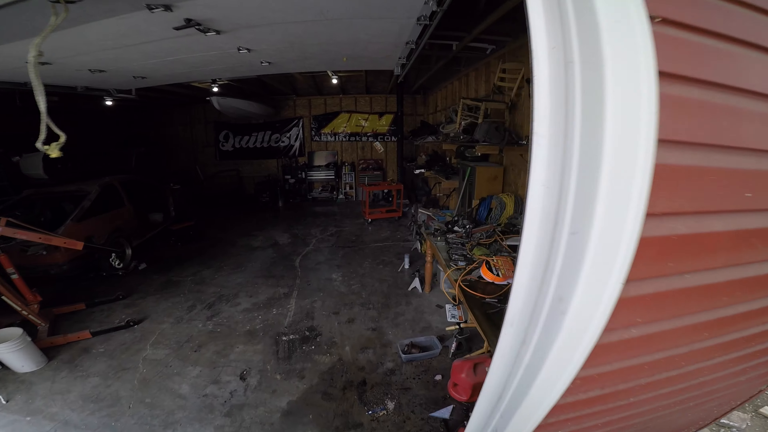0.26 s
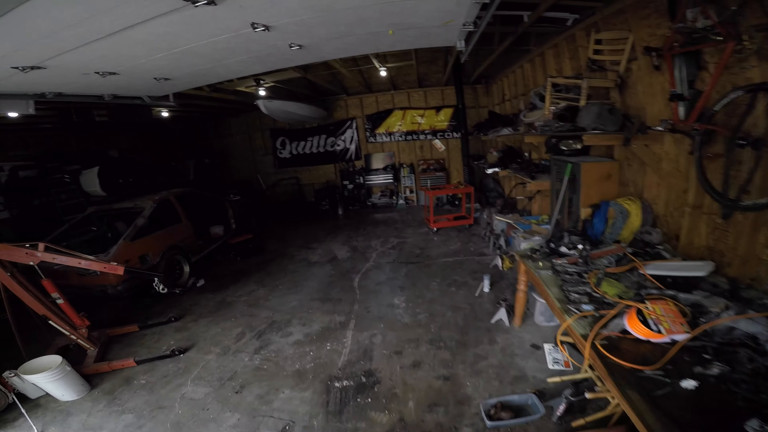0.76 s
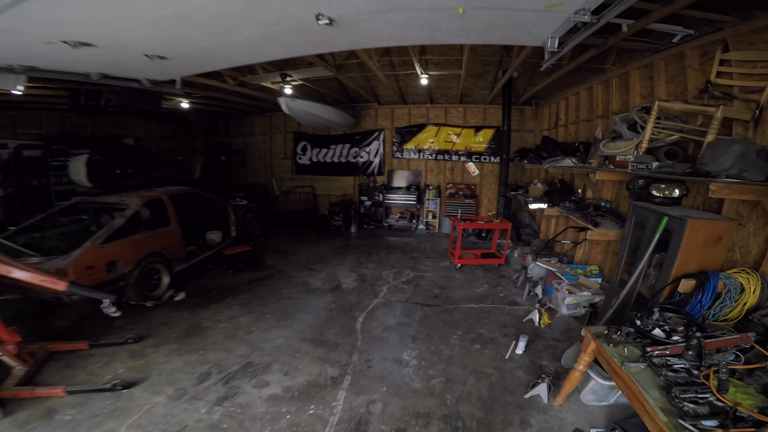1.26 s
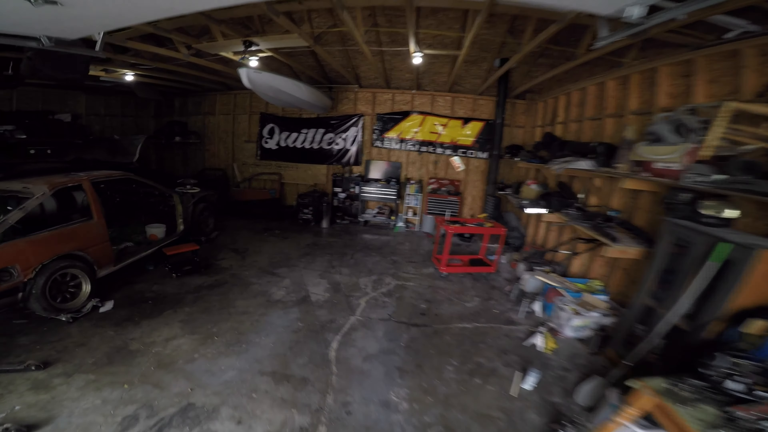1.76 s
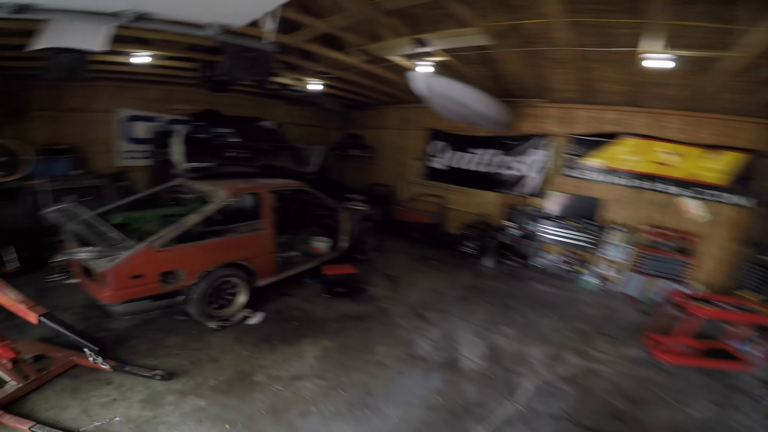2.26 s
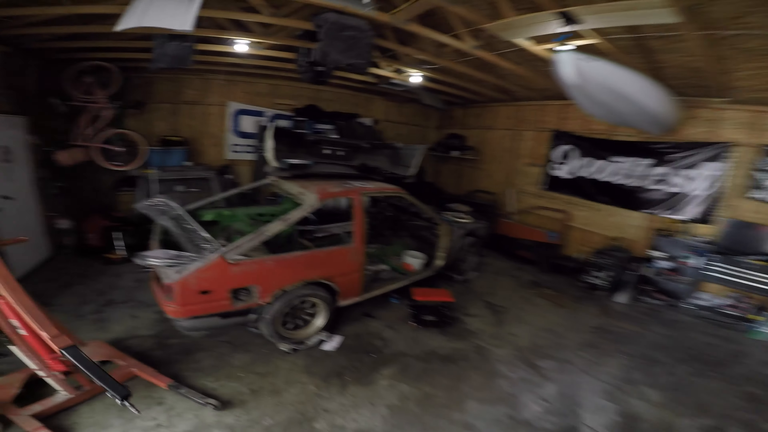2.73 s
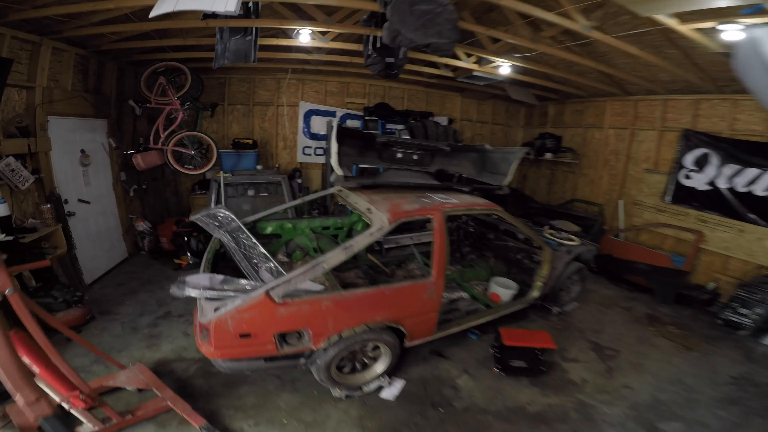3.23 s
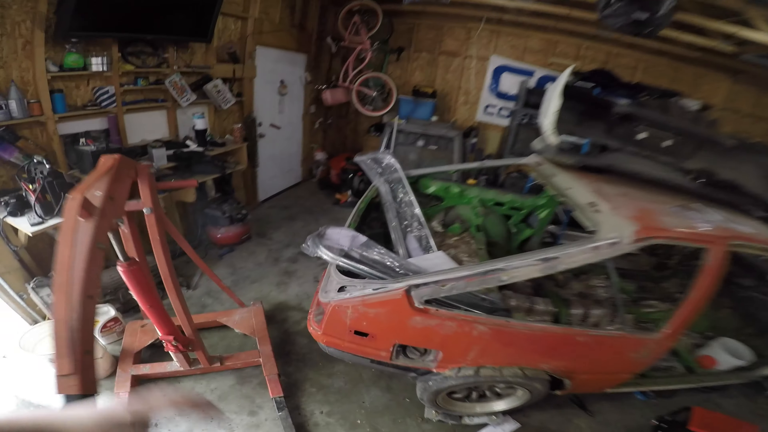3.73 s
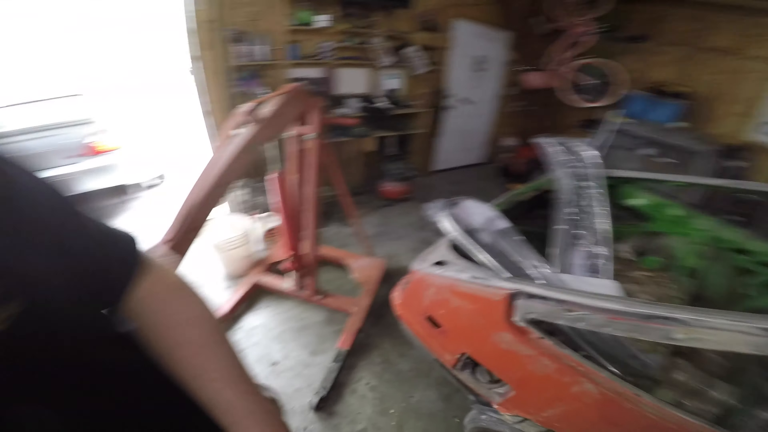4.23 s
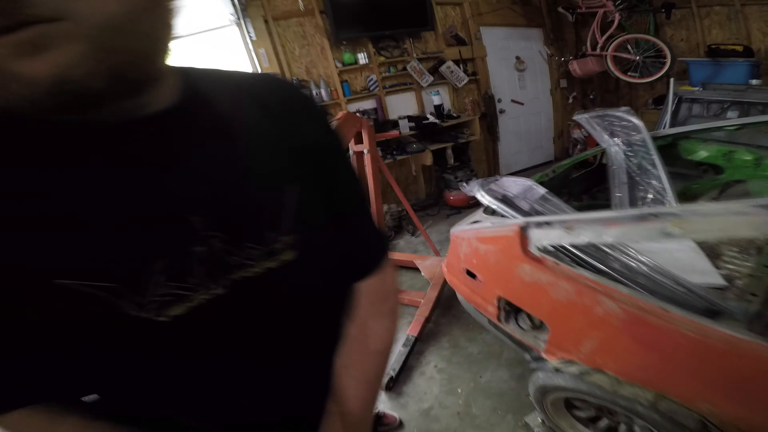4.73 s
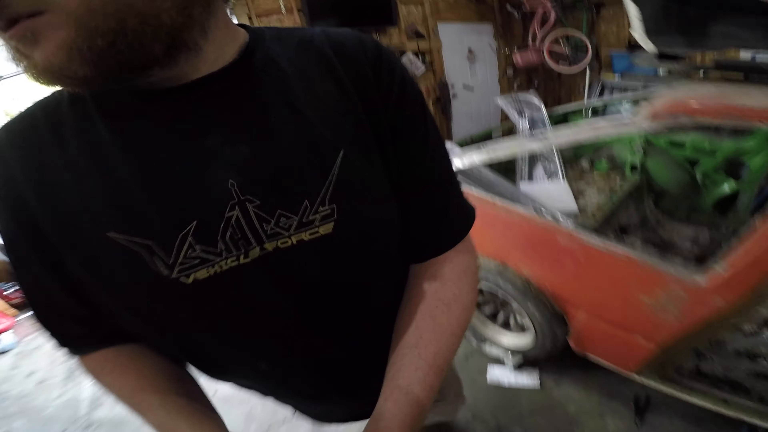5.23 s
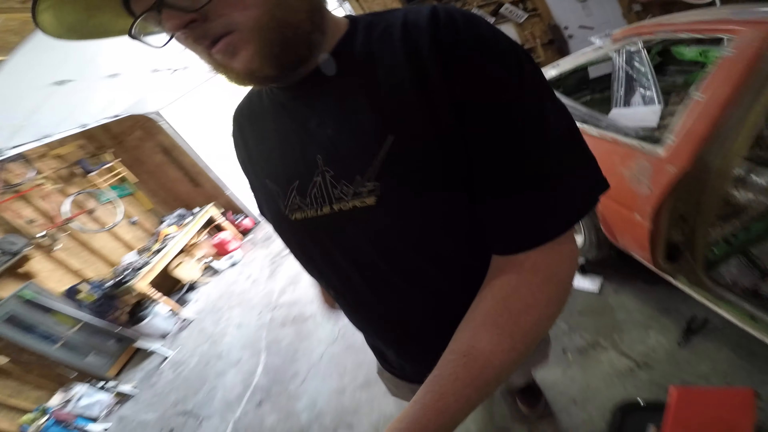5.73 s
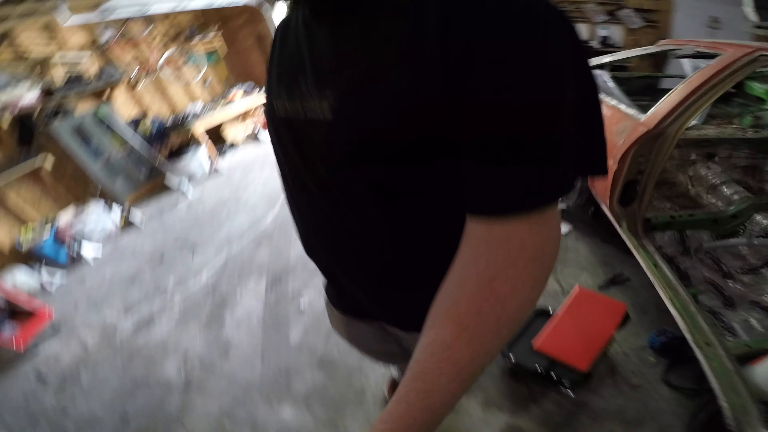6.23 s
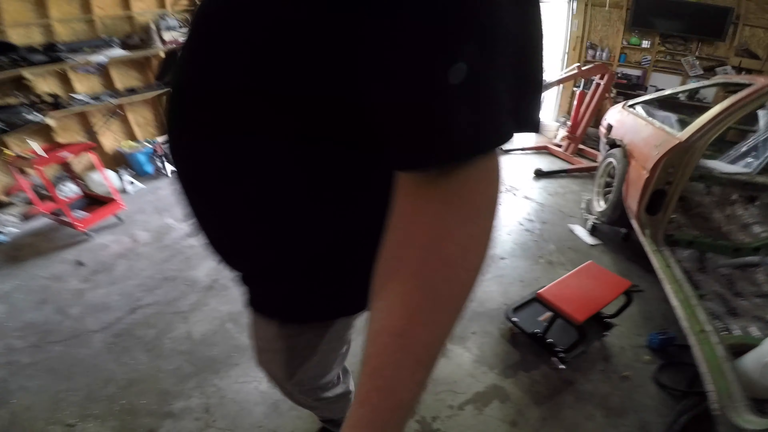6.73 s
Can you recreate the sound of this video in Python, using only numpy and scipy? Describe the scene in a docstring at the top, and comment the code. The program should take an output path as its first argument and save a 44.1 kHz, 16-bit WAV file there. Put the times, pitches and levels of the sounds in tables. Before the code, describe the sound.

Low, uneven idle of a four-cylinder engine booms in a workshop, stumbling about twice a second, while handling bumps, ticks and scuffs interrupt up close.

```python
"""Flat-four idling in a garage

A turbocharged flat-four idles with a lumpy beat; misfires upset the exhaust about twice a second.
Exhaust: harmonics of the cycle rate, shaped by the standing waves a hand-held camera is carried through.
Above it: bark from scattered firing pulses, filtered-noise rumble and hiss, and faint gliding tones.
Shoes scuff (noise swells); fingers and steps knock, nails tick and the mount creaks (clicks, ringing modes)."""
import sys
import numpy as np
from scipy import signal
from scipy.fft import rfft, irfft, next_fast_len
from scipy.io import wavfile
from scipy.ndimage import uniform_filter1d, minimum_filter1d

SR = 44100
rng = np.random.default_rng(int(sys.argv[2]) if len(sys.argv) > 2 else 0)


def generate_wav(sig):
    """Save sig (samples, or channels by samples) to the path in sys.argv[1] as 16-bit PCM at SR."""
    pcm = np.round(np.clip(np.atleast_2d(sig).T, -1, 1) * 32767).astype(np.int16)
    wavfile.write(sys.argv[1], SR, pcm)


N = 307805
T = np.arange(N) / SR   # time, s

# All table levels are relative; later gains set the final mix.

# Four-stroke cycle rate: t/s, f/Hz
CYCLE_RATE = [(0, 12.03), (1.0, 12.0), (1.351, 11.94), (2.0, 11.96), (2.8, 12.0), (3.7, 11.9), (4.0, 11.96),
              (4.45, 11.91), (5.0, 11.98), (5.65, 11.89), (6.15, 11.96), (6.98, 11.89)]
# Exhaust harmonics: multiple of cycle rate, mean level/dB
EXHAUST_ORDERS = [(3, -36), (4, -22), (5, -33.5), (6, -26), (7, -23), (8, -20), (9, -16.5), (10, -21),
                  (11, -22.5), (12, -20), (13, -28.5), (14, -31.5), (15, -23.5), (16, -41.5), (17, -29.5),
                  (18, -40), (19, -29), (20, -21), (21, -31), (22, -42), (23, -33.5), (24, -33.5),
                  (25, -43.5), (26, -43.5), (28, -39), (30, -48), (31, -46.5), (32, -50), (33, -45.5),
                  (34, -47.5), (36, -47.5), (41, -43), (46, -60), (50, -51), (54, -53.5), (61, -58)]
# Orders of four strong harmonics
STRONG_ORDERS = (8, 9, 15, 20)
# Their levels about the mean along the walk: t/s, then one level/dB per strong order
STRONG_LEVELS = [(0.15, -1.5, 0.5, -3, -2.5), (0.55, -5, 2.5, 0.5, 1), (0.9, -11.5, 5.5, -12, 4),
                 (1.2, -5.5, 5.5, -0.5, 1.5), (1.55, 1, 0, -2.5, 9), (1.92, 7, 3.5, -5.5, -2.5),
                 (2.25, 5, 3, -2.5, -1.5), (2.65, 7, 4, 1, -1), (3.0, 4.5, 0.5, -0.5, 3),
                 (3.35, 7, -3, 1, 7), (3.7, 0, -8, 5.5, 3), (4.2, 0.5, -5.5, 2, 0), (4.7, -1.5, -2, 3, -6),
                 (5.05, -1, 1, 5, -1), (5.4, -5.5, 2, -3.5, -9), (5.75, 5, 0.5, 3.5, -0.5),
                 (6.1, -3, -6.5, 5.5, -1.5), (6.45, 2, 1, -4, -4), (6.85, 3, 3, 4, -4.5)]
# A high harmonic that hums alone above its neighbours, about its mean: t/s, level/dB
HUM_LEVEL = [(0, -2.5), (.7, 5.5), (1.1, -6), (1.75, 3.5), (2.3, -9), (2.95, 4), (3.65, 4.5), (4.5, -3.5),
             (5.85, -5.5), (6.38, 6.5), (6.9, -4.5)]
HUM_ORDER = 41
# Garage standing waves, nodes crossed at even intervals; two at one pitch lie across each other:
# f/Hz, time of one node/s, node spacing/s, node depth/dB (sign ignored)
STANDING_WAVES = [(36, 3.5, 13, 16.5), (48, 3, 4.1, 3.5), (60, 2.5, 1.6, 6), (72, 4.5, 9.9, 11),
                  (84, 1, 4.61, 9), (120, 5.5, 5.66, 6.5), (120, -1.6, 2.7, -1), (132, 2.5, 3.85, 7.5),
                  (144, 1.76, 2.59, 8), (144, 1.2, 1.18, 4), (155, 1, 2.18, 11.5), (167, 2.55, 3.9, 6.5),
                  (191, 4.7, 1.7, 8), (203, 4, 8.8, 6), (215, 2, 3.2, 10.5), (227, 0.37, 2.03, 9),
                  (227, -0.3, 1.66, 3.5), (251, 1.9, 1.66, 8.5), (251, 2.5, 6.1, 9), (263, 0.9, 5.4, 12.5),
                  (275, 4, 4.94, 8.5), (275, 1.8, 1.3, 10), (287, 1.9, 3.28, 11), (287, 1.12, 2.67, 11),
                  (299, 1, 1.26, 2.5), (311, 1.5, 4.02, 15), (335, 2.5, 9.2, 12.5), (371, 0.3, 1.1, 4),
                  (395, 1, 1.1, 9.5), (598, 6.5, 12.0, 9), (646, 5, 6.49, 16)]
# Misfires of one cylinder: t/s, strength/dB
MISFIRES = [(0.216, 1), (0.966, -2), (1.467, 1.5), (1.969, -6.5), (2.22, -1), (2.72, -1), (3.305, 0.5),
            (3.808, -8), (3.892, -4), (4.235, -3.5), (4.479, -6.5), (4.897, -4), (5.35, -1), (5.987, -3.5),
            (6.573, 2.5)]
# Spectrum of the misfire chuff in pipe and room: f/Hz, density/dB
CHUFF_SPECTRUM = [(20, -23.5), (50, -13), (75, -1), (110, 0.5), (160, -9), (240, -9.5), (340, -19),
                  (450, -28), (650, -37), (1000, -56), (3000, -100)]
# Strength of the four firings of a cycle: level/dB
CYLINDER_DB = [3, -4.5, -7.5, -5.5]
# Upper engine range along the walk: t/s, bark level/dB, hiss level/dB
PRESENCE = [(0.0, -37.5, -53.5), (1.07, -35.5, -56), (1.44, -35, -55.5), (1.84, -35.5, -54),
            (2.2, -35, -55), (2.59, -39.5, -56.5), (3.27, -36, -54.5), (3.5, -38.5, -56.5),
            (4.3, -38, -58.5), (4.53, -43.5, -63), (5.3, -38, -59), (5.98, -39.5, -59), (6.35, -36.5, -56),
            (6.9, -32.5, -54)]
# Engine noise spectra: f/Hz, density/dB
BARK_SPECTRUM = [(100, -28.5), (280, -1), (380, 0.5), (500, -8), (700, -9.5), (830, -14.5), (950, -23.5),
                 (1300, -32.5), (2000, -47), (4000, -70), (10000, -90.5)]
HISS_SPECTRUM = [(500, 3.5), (1200, 7), (1900, -1), (2450, 1.5), (3300, -2), (5200, -6.5), (7400, -2.5),
                 (8600, -9.5), (10500, -13.5), (11500, -20), (13000, -36), (16000, -66)]
RUMBLE_SPECTRUM = [(10, -2), (25, 9.5), (55, 4), (100, 8.5), (160, 3.5), (250, -5.5), (330, -11),
                   (500, -39.5), (1000, -78.5), (3000, -120)]
# Faint thin tones and chirps, some of them a high exhaust harmonic gliding:
# t/s, f/Hz, level/dB, rise and fade/s, glide/(Hz/s)
THIN_TONES = [(1.645, 2440, -59, .03, 0), (1.81, 2545, -58, .04, -300), (1.95, 650, -39.5, .12, 130.5),
              (5.18, 749, -49, .15, 30), (6.26, 646, -42.5, 0.096, 0), (6.345, 2625, -61, 0.046, 0.5),
              (6.495, 2500, -60.5, .05, -300), (6.79, 2630, -61, .08, 400)]
# Knocks on the case, with clicks of grit underfoot and a sharp step:
# t/s, level/dB, contact low-pass f/Hz, share at left mic (negative: opposite sense)
KNOCKS = [(1.255, -25.5, 2420, -.3), (1.463, -28, 900, -.5), (2.4053, -9.5, 2190, -0.51),
          (2.895, -28.5, 3000, -0.47), (3.907, -22, 800, -0.66), (4.1802, -13.5, 2600, -0.48),
          (4.266, -26, 705, -0.38), (6.587, -14, 3000, -0.4), (6.753, -21, 1400, -0.7),
          (6.9373, -8, 6000, 0.55)]
# Case modes: f/Hz, level/dB, t60/s
CASE_MODES = [(470, -3.5, 0.018), (710, -0.5, 0.009), (900, -4.5, 0.015), (1142, -10, 0.026),
              (1396, -14, 0.026), (1690, -17, 0.0069), (2520, -24.5, 0.008), (3000, -25.5, 0.008)]
# Mount creaks as the grip shifts: t/s, level/dB, length/s, slip rate/Hz, contact low-pass f/Hz
CREAKS = [(3.278, -31.5, 0.014, 700, 3000), (4.263, -26, 0.0064, 640, 1200),
          (4.3422, -17.5, .004, 690, 3000), (4.3505, -18, .002, 940, 4000), (4.3555, -21, .005, 790, 2000),
          (4.363, -27.5, 0.013, 860, 1600), (4.385, -21, .005, 740, 2400), (4.396, -29, .024, 800, 2000),
          (4.422, -20.5, .009, 740, 2400), (5.3245, -21.5, .015, 750, 1100)]
# Mount modes: f/Hz, level/dB, t60/s
MOUNT_MODES = [(605, -1.5, .02), (705, 7.5, 0.022), (857, 1.5, 0.013), (997, -4.5, 0.027),
               (1330, -11, 0.011), (1610, -12.5, 0.013), (2030, -20.5, 0.014), (2430, -16, 0.012),
               (2880, -19, 0.012), (3010, -18.5, 0.011)]
# Finger pressing air into a mic port: t/s, level/dB, swing f/Hz, t60/s
BUMPS = [(4.265, -9.5, 380, 0.031), (4.270, -9, 115, 0.12), (5.324, -9, 120, 0.092),
         (6.927, -16, 224, 0.072), (6.933, -6.5, 260, 0.053), (6.9385, -2, 330, 0.031),
         (6.9378, -1, 744, 0.0059)]
# Fingernail ticks: t/s, level/dB
TICKS = [(3.954, -28.5), (4.279, -40), (4.306, -33), (4.423, -29.5), (4.482, -31), (4.505, -35),
         (5.331, -38), (5.342, -26), (5.354, -35), (5.417, -30), (5.431, -33), (6.9365, -18)]
# Shoe scuffs: t/s, level/dB, rise/s, fade/s
SCUFFS = [(1.74, -56.5, 0.087, 0.14), (3.275, -42, 0.022, 0.039), (6.589, -43.5, 0.002, 0.042)]
# Scuff spectrum: f/Hz, density/dB
SCUFF_SPECTRUM = [(300, 2), (700, 2.5), (1500, 10.5), (3000, 3), (7000, 5.5), (10000, -16.5), (15000, -28)]
# Level ducks as the hand shifts on the camera: start t/s, length/s, left level/dB, right level/dB
DUCKS = [(3.89, 0.033, -6, -1), (3.972, 0.21, -1.5, 0.5), (4.267, .26, -5.5, 0), (4.558, 0.084, -2, -2),
         (5.355, 0.04, -7, -2.5), (6.939, 0.039, -16, -3.5)]
# Left-right likeness of the noises: f/Hz, correlation (1 alike, -1 opposed)
LIKENESS = [(30, 0.077), (80, 0.24), (250, 0.4), (500, 0.84), (1000, -0.19), (2000, 0.35), (3000, .55),
            (5000, 0.45), (7500, 0.029), (12000, -0.13)]

BEAT_AT_CYCLE_SHARE = 0.21   # hardest beat of each cycle
BOOM_BELOW_HZ = 205          # below: the room holds the beat back, more the lower the harmonic
SHADED_ABOVE_HZ, SHADED_SHARE = 290, 0.96   # above: harmonics follow the bark level
LOOSE_ABOVE_HZ, LOOSE_RAD_PER_HZ = 245.8, 0.023   # above: walls scatter harmonics out of step
MISFIRE_RISE_S, MISFIRE_HOLD_S, MISFIRE_FADE_S = 0.006, 0.067, 0.066
MISFIRE_GAP = 0.35           # share of the exhaust note removed at unit upset
DUCK_ATTACK_S, DUCK_RELEASE_S = 0.014, 0.046
BALANCE_DB = -0.8            # left over right, airborne sound only
CUTOFF_HZ = 14000


def from_db(level_db):
    """Decibels to amplitude gain."""
    return 10 ** (np.asarray(level_db) / 20)


def rms_one(x):
    """Scale to unit rms."""
    return x / np.sqrt(np.mean(np.abs(x) ** 2) + 1e-20)


def in_time(rows):
    """Interpolate each column of a time table to every sample."""
    t_s, *columns = np.transpose(rows)
    return [np.interp(T, t_s, column) for column in columns]


def at_hz(points, f_hz):
    """Read a spectrum on a log-frequency axis."""
    table_hz, values = np.array(points).T
    return np.interp(np.log(f_hz), np.log(table_hz), values)


def butter(x, f_hz, kind, order=2):
    """Causal Butterworth filter."""
    sos = signal.butter(order, np.clip(f_hz, 10, 0.45 * SR), kind, fs=SR, output="sos")
    return signal.sosfilt(sos, x + 1e-18)


def drift(rate_hz, size=N, step=1):
    """Slow random curve of unit rms: low-passed noise at SR/100, read at every step-th sample."""
    pole = np.exp(-200 * np.pi * rate_hz / SR)
    white = rng.standard_normal(N // 100 + 1002)
    slow = signal.lfilter([1], [1, -2 * pole, pole * pole], white)[1000:]   # drop the settling
    return np.interp(np.arange(size) * step / 100, np.arange(len(slow)), rms_one(slow))


def ring(clicks, modes):
    """Clicks excite damped two-pole modes of alternating sign."""
    out = np.zeros(N)
    for k, (f_hz, level_db, t60_s) in enumerate(modes):
        r = np.exp(-np.log(1000) / (t60_s * SR))
        w = 2 * np.pi * f_hz / SR
        mode = signal.lfilter([0, np.sin(w)], [1, -2 * r * np.cos(w), r * r], clicks + 1e-18)
        out += (-1) ** k * from_db(level_db) * mode
    return out


def coloured(mid, side, spectrum):
    """Shape two unrelated signals to a spectrum and a left-right likeness; unit rms stereo."""
    size = next_fast_len(N)
    f_hz = np.maximum(np.fft.rfftfreq(size, 1 / SR), 1)
    gain = from_db(at_hz(spectrum, f_hz))
    alike = np.clip(at_hz(LIKENESS, f_hz), -1, 1)
    common = np.sqrt(1 + alike) * rfft(mid, size)
    opposed = np.sqrt(1 - alike) * rfft(side, size) * [[1], [-1]]
    return rms_one(irfft(gain * (common + opposed), size)[:, :N])


def noise(spectrum):
    """Stereo noise of a given spectrum."""
    return coloured(*rng.standard_normal((2, N)), spectrum)


def swell(peak_s, rise_s, fade_s, hold_s=0):
    """Exponential rise to a peak, hold, exponential fade."""
    rising = (peak_s - T) / rise_s
    fading = (T - peak_s - hold_s) / fade_s
    return np.exp(-np.clip(np.maximum(rising, fading), 0, 20))


def click(t_s, level_db):
    """One impulse."""
    out = np.zeros(N)
    out[min(round(t_s * SR), N - 1)] = from_db(level_db)
    return out


def engine(bark_db=1.0, hiss_db=5.0, rumble_db=-30, chuff_db=-14, throb=0.079, flicker_db=0.5):
    """Exhaust note broken by misfire chuffs, plus bark, throbbing bay hiss and rumble."""
    cycle = np.cumsum(in_time(CYCLE_RATE)[0]) / SR
    near_bark_db, near_hiss_db = in_time(PRESENCE)
    clicks, puff = firings(cycle)
    upset = misfiring()
    note = exhaust_note(cycle) * np.maximum(1 - MISFIRE_GAP * upset, 0)
    chuff = from_db(chuff_db) * upset * noise(CHUFF_SPECTRUM)[0]
    hiss_gain = from_db(near_hiss_db + hiss_db + flicker_db * drift(9.8))
    hiss = hiss_gain * rms_one(1 + throb * puff) * noise(HISS_SPECTRUM)
    exhaust = at_ports(note + chuff)
    barking = from_db(near_bark_db + bark_db) * bark(clicks, puff)
    return exhaust + barking + hiss + from_db(rumble_db) * noise(RUMBLE_SPECTRUM)


def exhaust_note(cycle, smear_rad=0.8, scatter_rad=0.49, wander_rad=0.54, rough=0.051, surge=0.066,
                 wander_db=2.5, mode_wander_db=1.13, level_db=1.02):
    """Sum cycle-locked harmonics, lifted or sunk by the standing waves the walk crosses."""
    step = 20   # low tones need only every 20th sample
    cycle, t_s = cycle[::step], T[::step]
    size, out = len(t_s), 0
    rate_hz = np.mean(np.array(CYCLE_RATE)[:, 1])
    orders = np.round(np.array(EXHAUST_ORDERS)[:, 0])
    pitches_hz = orders * rate_hz
    near_db = in_time(PRESENCE)[0][::step]
    tracked_db = [curve[::step] for curve in in_time(STRONG_LEVELS) + in_time(HUM_LEVEL)]
    for i, (order, (_, mean_db)) in enumerate(zip(orders, EXHAUST_ORDERS)):
        pitch_hz = pitches_hz[i]
        # each standing wave acts on the nearest harmonic
        shifts_db = [standing_wave_db(t_s, *pattern) for f_hz, *pattern in STANDING_WAVES
                     if np.argmin(abs(pitches_hz - f_hz)) == i]
        shifts_db += [curve for k, curve in zip((*STRONG_ORDERS, HUM_ORDER), tracked_db) if k == order]
        # harmonics without a given curve wander more
        spread_db = mode_wander_db if shifts_db else wander_db
        order_db = mean_db + sum(shifts_db) + spread_db * drift(0.88, size, step)
        if pitch_hz > SHADED_ABOVE_HZ:
            order_db = order_db + SHADED_SHARE * (near_db - near_db.mean())
        # middle harmonics arrive as one beat, low ones boom on
        boom = smear_rad * (max(BOOM_BELOW_HZ - pitch_hz, 0) / rate_hz) ** 2
        loose = min(LOOSE_RAD_PER_HZ * max(pitch_hz - LOOSE_ABOVE_HZ, 0), np.pi)
        phase = 2 * np.pi * order * (cycle - BEAT_AT_CYCLE_SHARE) + boom
        phase = phase + (scatter_rad + loose) * rng.standard_normal()
        # the path shifts as the camera moves
        phase = phase + wander_rad * (1 + 0.5 * loose) * drift(0.55, size, step)
        # uneven burning
        burn = 1 + rough * (drift(2.4, size, step) + 1j * drift(5, size, step))
        out = out + from_db(order_db) * np.real(burn * np.exp(1j * phase))
    # strong and weak cycles move all harmonics together
    out = out * (1 + surge * drift(6, size, step))
    return from_db(level_db) * signal.resample_poly(out, step, 1)[:N]


def standing_wave_db(t_s, node_s, spacing_s, depth_db):
    """Level through one standing wave: broad crests, narrow troughs; mean 0 dB."""
    trough = from_db(-abs(depth_db)) ** 2
    crest = np.sin(np.pi * (t_s - node_s) / spacing_s) ** 2
    level_db = 10 * np.log10(trough + (1 - trough) * crest)
    return level_db - level_db.mean()


def misfiring():
    """Upset of the exhaust: each misfire sets in fast, holds and dies away in the room."""
    return sum(from_db(level_db) * swell(t_s + MISFIRE_RISE_S, MISFIRE_RISE_S, MISFIRE_FADE_S, MISFIRE_HOLD_S)
               for t_s, level_db in MISFIRES)


def firings(cycle, uneven_db=1.5, puff_s=0.005):
    """Four uneven blow-downs a cycle: clicks, and the decaying gas puff behind each."""
    count = np.floor(4 * cycle).astype(int)
    at = np.flatnonzero(np.diff(count)) + 1
    strength_db = np.array(CYLINDER_DB)[count[at] % len(CYLINDER_DB)]
    clicks = np.zeros(N)
    clicks[at] = from_db(strength_db + uneven_db * rng.standard_normal(len(at)))
    puff = signal.lfilter([1], [1, -np.exp(-1 / (puff_s * SR))], clicks)
    return rms_one(clicks), rms_one(puff)


def bark(clicks, puff, gas=1.0, chug=0.16, echo_s=0.038, spots=7):
    """Firing pulses scattered by walls, crossfaded between spots of the walk, in a roar of gas."""
    lag_s = T[:SR // 4]
    pulses = 0
    for spot in range(spots):
        walls = rng.standard_normal((2, len(lag_s))) * np.exp(-lag_s / echo_s)
        near = np.sqrt(np.maximum(1 - abs(T / T[-1] * (spots - 1) - spot), 0))
        pulses = pulses + near * signal.oaconvolve(clicks[None], walls, axes=1)[:, :N]
    roar = rms_one((1 + chug * puff) * rng.standard_normal((2, N)))
    return coloured(*(rms_one(pulses) + gas * roar), BARK_SPECTRUM)


def at_ports(x, lag_s=0.00013, turn_rate_hz=0.7):
    """Two-port arrival; the lag drifts as the camera turns."""
    lag = lag_s * drift(turn_rate_hz)
    return np.array([np.interp(T - lag, T, x), np.interp(T + lag, T, x)])


def knocks_and_handling(shake_share=0.87, shake_lag_s=0.0001, bump_share=0.13, bump_lag_s=0.001024,
                        bump_hz=1500, tick_db=-11.5, tick_hz=(2000, 9000)):
    """Finger and step knocks, stick-slip creaks, port bumps and ticks."""
    blows = [(butter(click(t_s, level_db), f_hz, "low", order=1), share)
             for t_s, level_db, f_hz, share in KNOCKS]
    creak = creaks()
    # creaks reach the left mic in the opposite sense, as do most knocks; both come later there
    left = case(sum(share * blow for blow, share in blows)) - shake_share * creak
    right = case(sum(blow for blow, _ in blows)) + creak
    bumps = sum(ring(click(t_s, level_db), [(f_hz, 0, t60_s)]) for t_s, level_db, f_hz, t60_s in BUMPS)
    bumps = butter(bumps, bump_hz, "low")
    ticks = butter(sum(click(t_s, level_db) for t_s, level_db in TICKS), tick_hz, "band")
    tick_tail = rng.standard_normal(200) * np.exp(-T[:200] / 0.0009)
    ticks = signal.fftconvolve(ticks, tick_tail)[:N]
    # bumps reach the left port later and weaker
    left = np.interp(T - shake_lag_s, T, left) + bump_share * np.interp(T - bump_lag_s, T, bumps)
    return np.array([left, right + bumps]) + from_db(tick_db) * ticks


def case(blows, crack_db=8, crack_hz=(1500, 4200)):
    """Knock response: dry band-passed crack plus ringing case modes."""
    return ring(blows, CASE_MODES) + from_db(crack_db) * butter(blows, crack_hz, "band")


def creaks(jitter=0.072, uneven_db=3.0, creak_db=-7.0):
    """Runs of nearly regular stick-slip ring the mount; a soft grip dulls them."""
    slips = np.zeros(N)
    for t_s, level_db, length_s, rate_hz, f_hz in CREAKS:
        count = max(round(length_s * rate_hz), 1)
        at_s = (np.arange(count) + jitter * rng.standard_normal(count)) / rate_hz
        run = np.zeros(SR // 20)
        at = np.clip(np.round(at_s * SR).astype(int), 0, len(run) - 1)
        run[at] = from_db(level_db + uneven_db * rng.standard_normal(count))
        start = round(t_s * SR)
        slips[start:start + len(run)] += butter(run, f_hz, "low")
    return from_db(creak_db) * ring(slips, MOUNT_MODES)


def feet():
    """Gritty slide of a sole: noise swells."""
    envelope = sum(from_db(level_db) * swell(t_s, rise_s, fade_s) for t_s, level_db, rise_s, fade_s in SCUFFS)
    return envelope * noise(SCUFF_SPECTRUM)


def thin_tones(waver_share=0.012, flutter_db=2):
    """Faint sine tones that waver, some gliding, as they swell and fade."""
    out = np.zeros(N)
    for t_s, f_hz, level_db, length_s, glide_hz_per_s in THIN_TONES:
        pitch_hz = (f_hz + glide_hz_per_s * (T - t_s)) * (1 + waver_share * drift(25))
        tone = np.sqrt(2) * np.sin(2 * np.pi * np.cumsum(pitch_hz) / SR)
        gain = from_db(level_db + flutter_db * drift(45))
        out += gain * swell(t_s, length_s, length_s) * tone
    return out


def ducking():
    """Gain of the two mics: each duck sets in fast, holds and lets go."""
    gain_db = np.zeros((2, N))
    for t_s, length_s, left_db, right_db in DUCKS:
        attack = 1 - np.exp(-np.maximum(T - t_s, 0) / DUCK_ATTACK_S)
        release = np.exp(-np.maximum(T - t_s - length_s, 0) / DUCK_RELEASE_S)
        gain_db += np.outer([left_db, right_db], attack * release)
    return from_db(gain_db)


def scene():
    """Engine, scuffs and thin tones, ducked and balanced; knocks and handling on top."""
    airborne = (engine() + feet() + thin_tones()) * ducking() * from_db([[BALANCE_DB], [0]])
    return airborne + from_db(4.5) * knocks_and_handling()


def held_peaks(over_db, release_db_per_s):
    """Peak hold with a linear dB release."""
    fall_db = release_db_per_s * T
    return np.maximum.accumulate(over_db + fall_db, axis=-1) - fall_db


def levelled(x, key_hz=300, threshold_db=-6.0, recovery_db_per_s=45, smoothing_s=0.0034, make_up_db=1.47):
    """Bass-keyed automatic gain evens the exhaust beats."""
    key = np.abs(butter(x.mean(axis=0), key_hz, "low"))
    over_db = np.maximum(20 * np.log10(key + 1e-9) - threshold_db, 0)
    cut_db = uniform_filter1d(held_peaks(over_db, recovery_db_per_s), size=max(int(smoothing_s * SR), 1))
    return x * from_db(make_up_db - cut_db)


def record(dry, limit_db=12.0, release_db_per_s=80, gain_db=0.0):
    """Automatic gain, peak limiter, soft flattening near full scale, treble cut."""
    dry = levelled(dry) * from_db(gain_db)
    over_db = np.maximum(20 * np.log10(np.abs(dry) + 1e-9) - limit_db, 0)
    cut_db = minimum_filter1d(-held_peaks(over_db, release_db_per_s), size=100, axis=1)
    limited = dry * from_db(uniform_filter1d(cut_db, size=300, axis=1))
    flattened = limited / (1 + (limited / 0.96) ** 12) ** (1 / 12)
    return butter(flattened, CUTOFF_HZ, "low", order=10)


dry = scene()
out = record(dry)
generate_wav(out)
```